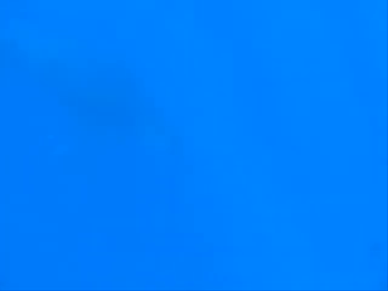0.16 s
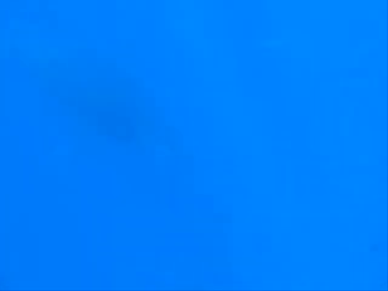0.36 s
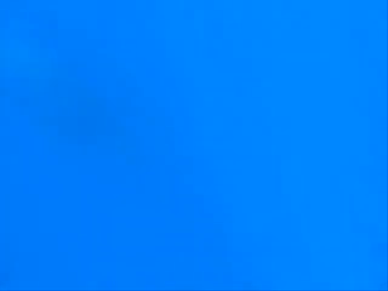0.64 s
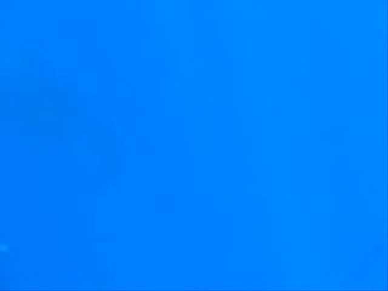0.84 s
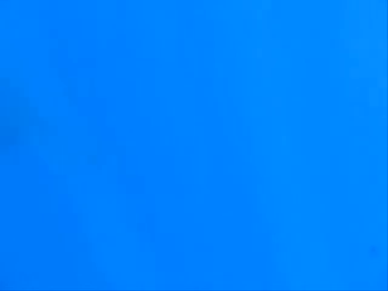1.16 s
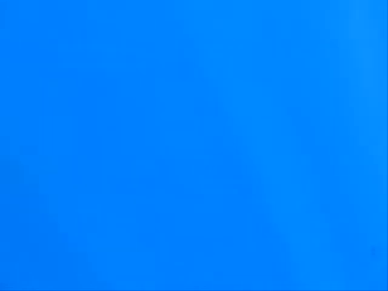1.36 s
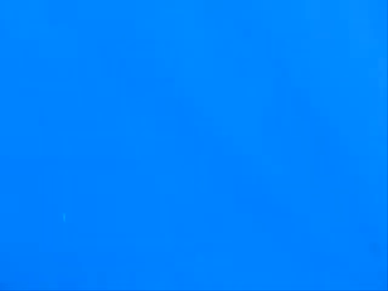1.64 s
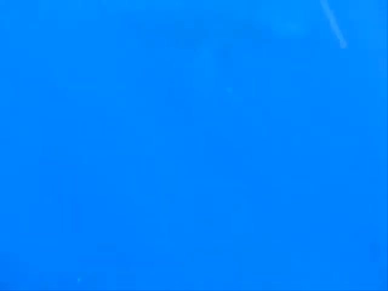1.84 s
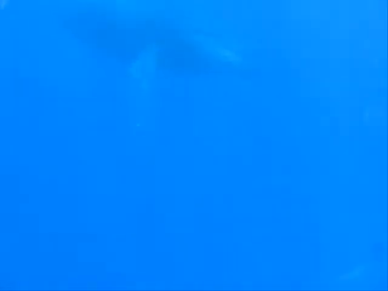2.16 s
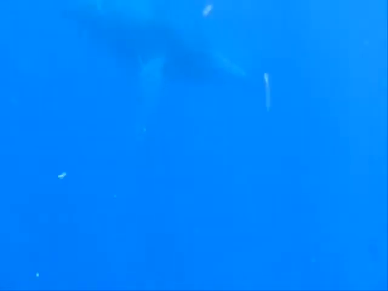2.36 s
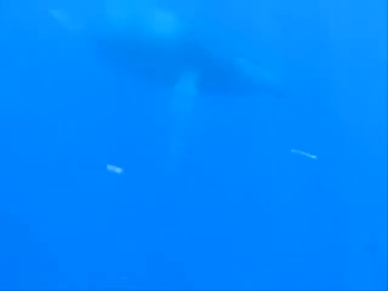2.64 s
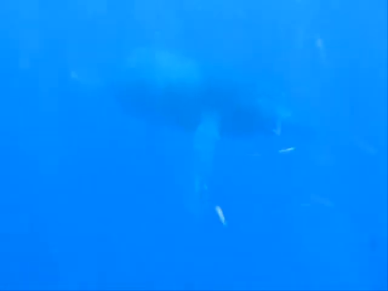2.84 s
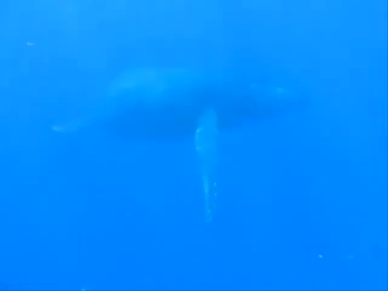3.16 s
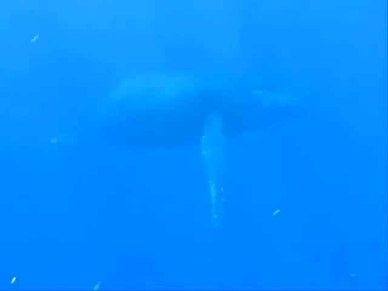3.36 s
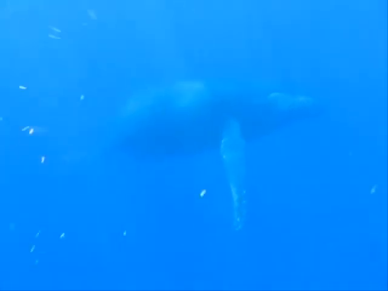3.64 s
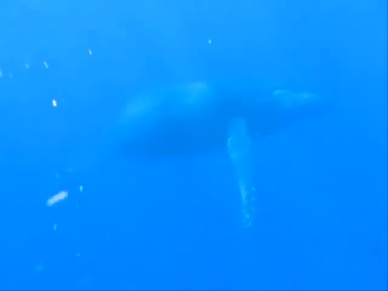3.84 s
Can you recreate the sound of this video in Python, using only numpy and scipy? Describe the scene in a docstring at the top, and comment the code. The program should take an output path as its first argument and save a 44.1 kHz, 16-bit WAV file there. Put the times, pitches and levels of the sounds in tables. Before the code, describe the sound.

Humpback whale song underwater: a high piercing cry, then a lower rough moan, with water glugs

```python
"""Humpback whale song at an underwater housing

A high cry, nearly sinusoidal with weak overtones, starts with a flutter made by modulation sidebands.
A moan, a pulse train through fixed resonances, climbs out of a creak, holds and sinks away.
Water glugs and small bubbles ring as damped tones; clicks are short noise bursts; slosh and hiss are
coloured noise. The song gains a reflection and a scattered tail. The right port hears far more than the left.
"""
import sys
import numpy as np
from scipy import signal
from scipy.fft import rfft, irfft
from scipy.io import wavfile
from scipy.ndimage import uniform_filter1d

SR = 44100
rng = np.random.default_rng(int(sys.argv[2]) if len(sys.argv) > 2 else 0)


def wav_out(sig):
    """Save sig, one row per channel (or a flat mono array), as 16-bit PCM at SR to the path in sys.argv[1]."""
    wavfile.write(sys.argv[1], SR, np.round(np.clip(np.atleast_2d(sig).T, -1, 1) * 32767).astype(np.int16))


N = 176400
T = np.arange(N) / SR  # time, s
EDGE_HZ = 12050  # upper band limit


def amp(db):
    """Level law: decibels to amplitude ratio."""
    return 10 ** (np.asarray(db) / 20)


def unit(x):
    """Normalization: scales a signal to an rms of 1."""
    return x / np.sqrt(np.mean(x ** 2) + 1e-20)


def steady(x):
    """Short-time normalization: holds the running rms near 1."""
    power = abs(uniform_filter1d(x ** 2, size=2048))
    return x / np.sqrt(power + 1e-9)


def curves(table):
    """Linear interpolation: joins each column of a table over time."""
    s, *columns = np.transpose(table)
    return [np.interp(T, s, column) for column in columns]


def during(table):
    """Gating: 1 between a table's first and last time, with 10 ms linear fades outside."""
    inside_s = np.minimum(T - table[0][0], table[-1][0] - T)
    return np.clip(inside_s * 100 + 1, 0, 1)


def add(mix, start_s, sound):
    """Superposition: adds a sound into the mix from its start time."""
    part = mix[max(round(start_s * SR), 0):][:len(sound)]
    part += sound[:len(part)]


def colour(x, points, size=4096):
    """Minimum-phase filtering: the log gain and its Hilbert transform give a causal response."""
    hz, db = np.transpose(points)
    bin_hz = abs(np.fft.fftfreq(size, 1 / SR))
    gain_db = np.interp(np.log(bin_hz + 1), np.log(hz), db)
    spectrum = np.exp(np.conj(signal.hilbert(np.log(amp(gain_db)))))
    taps = np.fft.ifft(spectrum).real
    return signal.oaconvolve(x, taps[:size // 2])[:N]


def noise(points):
    """Spectral shaping: white noise filtered to a curve, with an rms of 1."""
    return unit(colour(rng.standard_normal(N), points))


def wander(rate_hz):
    """Low-pass random fluctuation: noise confined mostly below a rate, with an rms of 1."""
    low_pass = 1 / (1 + (np.fft.rfftfreq(N, 1 / SR) / rate_hz) ** 4)
    return unit(irfft(rfft(rng.standard_normal(N)) * low_pass, N))


def angle(hz):
    """Phase is the time integral of angular frequency."""
    return 2 * np.pi * np.cumsum(hz) / SR


def random_phase():
    """Arbitrary starting phase of a partial, in radians."""
    return rng.uniform(0, 2 * np.pi)


def hiss():
    """Independent stationary noise at each port, left then right."""
    # Noise spectra of the ports: hz, relative_db
    left_spectrum = [(20, -6.5), (400, -1.5), (3500, -4), (6500, -9.5), (8000, -23.5), (12000, -23.5)]
    right_spectrum = [(400, 8.5), (1000, -1.5), (3700, -11.5), (4700, -10), (9000, -22.5)]
    left_db, right_db = -52, -53.5
    return amp(left_db) * noise(left_spectrum), amp(right_db) * noise(right_spectrum)


def slosh():
    """Random amplitude modulation of low coloured noise: water moving at the housing."""
    # Level of the slosh: time_s, level_db
    slosh_track = [(0, -52), (1.5, -58), (1.75, -36), (1.95, -41.5), (2.42, -49), (4, -57)]
    # Spectrum of the slosh: hz, relative_db
    slosh_spectrum = [(20, -15), (170, -8), (325, 1), (550, -27.5), (3500, -32), (8000, -60.5)]
    level_db, = curves(slosh_track)
    return noise(slosh_spectrum) * amp(level_db + 3.13 * wander(rate_hz=38))


def clicks():
    """Impulsive excitation: exponentially decaying noise bursts through a colouring filter."""
    # Dry clicks: start_s, level_db
    click_events = [(2.471, -30.5), (3.74, -30.5), (3.766, -28.5)]
    # Spectrum of the clicks: hz, gain_db
    click_spectrum = [(200, 4.5), (1400, 2), (4200, 8.5), (9000, -14)]
    decay_s = 0.0039  # time to fall to 1/e
    bursts, t = np.zeros(N), T[:SR // 4]
    for start_s, level_db in click_events:
        add(bursts, start_s, amp(level_db) * np.exp(-t / decay_s) * rng.standard_normal(len(t)))
    return colour(bursts, click_spectrum)


def ring(db, hz, t60_s, rise_s):
    """Damped resonance: a pocket of air swells into a decaying sinusoid."""
    t = T[:SR // 2]
    swell = 1 - np.exp(-(t / rise_s) ** 2)
    return amp(db - 60 * t / t60_s) * swell * np.sin(2 * np.pi * hz * t)


def bubbles():
    """Bubble resonance: small air volumes ring high and briefly."""
    # Small bubbles: start_s, level_db, pitch_hz
    bubble_events = [(1.561, -39, 1390), (1.843, -31, 1420), (1.889, -29, 1290), (1.937, -34.5, 1270)]
    out = np.zeros(N)
    for start_s, level_db, hz in bubble_events:
        add(out, start_s, ring(level_db, hz, t60_s=0.034, rise_s=0.00068))
    return out


def glugs():
    """Air-cavity resonance: each glug rings for a fixed number of cycles over a heavily damped thud."""
    # Water glugging on the housing: start_s, level_db, pitch_hz
    glug_events = [(0.604, -21.5, 304), (1.073, -32, 302), (1.325, -32.5, 282), (1.552, -20.5, 283),
                   (1.684, -20, 282), (1.721, -24, 285), (1.75, -14.5, 334), (1.833, -18, 310),
                   (1.852, -24, 308), (1.921, -22, 316), (2.091, -28.5, 328), (2.224, -28, 234),
                   (2.299, -32, 248), (2.449, -28.5, 322), (2.495, -19.5, 174), (2.598, -23.5, 243),
                   (3.133, -29.5, 240)]
    decay_cycles = 22.2  # cycles in a 60 dB decay
    thud_db, thud_s = -16.5, 0.0057  # relative to the glug; decay time and half period
    out, t = np.zeros(N), T[:SR // 4]
    thud = np.sin(np.pi * t / thud_s) * np.exp(-t / thud_s)
    for start_s, level_db, hz in glug_events:
        add(out, start_s, ring(level_db, hz, t60_s=decay_cycles / hz, rise_s=0.0033))
        add(out, start_s, amp(level_db + thud_db) * thud)
    return out


def sea(x):
    """Reflection and scattering: a delayed surface echo and a short, exponentially decaying random tail."""
    echo_s, echo_db = 0.041, -11.5
    tail_t60_s, tail_db = 0.36, -14  # level of the whole tail's energy
    t = T[:SR // 2]
    decay = amp(-60 * t / tail_t60_s)
    tail = amp(tail_db) * decay * rng.standard_normal(len(t)) / np.linalg.norm(decay)
    echo = amp(echo_db) * np.interp(T - echo_s, T, x, left=0)
    return x + echo + signal.oaconvolve(x, tail)[:N]


def moan():
    """Source-filter voice: pulses with subharmonic modulation pass through fixed resonances, with a rasp."""
    # Course of the moan: time_s, pitch_hz, level_db
    moan_track = [(2.52, 201.1, -46), (2.58, 238.9, -42), (2.635, 371.3, -33.5), (2.7, 489, -28),
                  (2.75, 536.6, -25.5), (2.815, 553, -20), (2.855, 529.7, -20.5), (2.95, 531.7, -21),
                  (3.02, 523.6, -19.5), (3.065, 529, -18), (3.16, 519.6, -18), (3.25, 525.5, -18),
                  (3.34, 562, -22.5), (3.46, 551.7, -25.5), (3.57, 490, -30.5), (3.62, 441, -33),
                  (3.67, 365, -31), (3.76, 246.3, -46), (3.81, 220, -54)]
    # Unevenness of the pulses: time_s, second_pulse_depth_db, third_pulse_depth_db, rasp_level_db
    rough_track = [(2.51, 8, -28, -56.5), (2.58, -3, 1, -35.5), (2.655, -18, -4, -28.5),
                   (2.7, 7, -5.5, -58), (2.85, -6, -21, -31.5), (2.97, -29, -42, -56),
                   (3.13, -38, -48, -41.5), (3.29, -42, -34, -22.5), (3.38, -42, -7, -41),
                   (3.55, -30, -30, -42), (3.8, -30, -27, -47)]
    # Resonances of the throat: hz, gain_db
    throat = [(100, -37), (200, -9.5), (290, 3), (350, 2), (450, -9.5), (680, -3.5), (1080, -0.5),
              (1500, -3), (1750, -12), (2130, 3.5), (2400, -12), (2700, -12), (3700, -20), (4500, -29.5),
              (6500, -21.5), (8200, -39.5), (9900, -27.5), (12000, -37)]
    # Spectrum of the rasp: hz, gain_db
    rasp_spectrum = [(200, -15.5), (900, -20.5), (1450, 8.5), (1800, -5.5), (2200, 9), (2900, 3.5),
                     (4600, -12), (6500, -17), (12000, -31)]
    jitter, rasp_air, rasp_steady = 0.00675, 2.3, 1  # relative pitch rms; relative amplitudes
    hz, level_db = curves(moan_track)
    second_db, third_db, rasp_db = curves(rough_track)
    phase = angle(hz * (1 + jitter * wander(rate_hz=228)))

    pulses = 0.5
    for k in range(1, 40):
        below_edge = np.clip((EDGE_HZ - k * hz) / hz, 0, 1)  # harmonics fade out near the band limit
        pulses = pulses + np.cos(k * phase) * below_edge
    pattern = 1 + amp(second_db) * np.cos(phase / 2) + amp(third_db) * np.cos(phase / 3)
    uneven_pulses = pulses * pattern
    voice = steady(colour(uneven_pulses, throat))

    rough_pulses = steady(uneven_pulses) * (rasp_steady + wander(rate_hz=210))
    puffs = rasp_air * (1 + np.cos(phase)) * rng.standard_normal(N)  # noise pulsing at the pitch
    rasp = steady(colour(rough_pulses + puffs, rasp_spectrum))
    return (amp(level_db) * voice + amp(rasp_db) * rasp) * during(moan_track)


def between_harmonics(phase, n):
    """Subharmonic series: fluctuating partials at multiples of 1/n of the pitch, harmonics left out."""
    total = np.zeros(N)
    for k in range(2 * n, 9 * n):
        if k % n:
            total += np.cos(k / n * phase + random_phase()) * (1 + 0.5 * wander(rate_hz=20))
    return total


def cry():
    """Modulation sidebands: a flutter splits a nearly pure tone at first and as it breaks off."""
    # Course of the cry, the last two relative to the level: time_s, pitch_hz, level_db, octave_db, upper_db
    cry_track = [(0, 1254, -35, -26, -11.5), (.19, 1247, -28, -30, -3.5), (.34, 1286, -19, -27.5, -10),
                 (.4, 1310, -16, -31.5, -17.5), (.47, 1302, -12.5, -33.5, -16),
                 (.535, 1322, -14.5, -20, -17.5), (.565, 1392, -18, -13.5, -30),
                 (.64, 1389, -18.5, -12, -29.5), (.84, 1401, -15.5, -10, -21.5),
                 (.92, 1375, -15.5, -12, -22.5), (1.08, 1373, -16.5, -16.5, -23.5),
                 (1.11, 1297, -20.5, -25, -6), (1.18, 1272, -32, -20, 3.5), (1.21, 1331, -28.5, -15, -17),
                 (1.3, 1277, -56, -5, -25)]
    # Roughness of the cry: time_s, flutter_depth_db, hiss_level_db
    rough_track = [(0, 9.5, -37.5), (.17, -6.5, -41), (.3, -40.5, -53.5), (1.1, -43.5, -61.5),
                   (1.24, -7, -37), (1.32, -2, -71)]
    # Side tones of the flutter: steps_from_pitch, relative_db
    side_tones = [(-2, -0.5), (-1, 3), (1, -5.5), (2, -11.5)]
    # Thin ringing above the register break: hz, relative_db
    ringing = [(5313, -27.5), (6401, -33), (9189, -33.5), (10901, -33)]
    # Spectra of the buzz, the upper overtones and the hiss: hz, relative_db
    buzz_spectrum = [(2000, -24), (4600, -1), (5400, 5), (8200, -7), (9300, 0.5)]
    overtone_spectrum = [(4200, 1.5), (5200, -11.5), (6500, -17.5), (7800, -22), (11000, -24.5)]
    hiss_spectrum = [(200, 0), (2200, 0.5), (4300, -3), (5200, 2), (8200, -15)]
    flutter_hz, flutter_wander, jitter = 89.8, 0.067, 0.0026  # the last two are relative rms
    overtone_flutter = 0.24  # share of the flutter that reaches the upper overtones
    break_hz, undertone_db, buzz_db = 1367.3, -18, -38.5  # pitch of the register break; relative levels
    hz, level_db, octave_db, upper_db = curves(cry_track)
    flutter_db, hiss_db = curves(rough_track)
    phase = angle(hz * (1 + jitter * wander(rate_hz=60)))
    beat = angle(flutter_hz * (1 + flutter_wander * wander(rate_hz=22)))

    flutter = np.zeros(N, complex)
    for step, side_db in side_tones:
        flutter += amp(side_db) * np.exp(1j * (step * beat + random_phase()))
    flutter *= amp(flutter_db)
    tone = (np.exp(1j * phase) * (1 + flutter)).real

    high = np.clip((hz - break_hz) / 20 + 0.5, 0, 1)  # 0 below the register break, 1 above
    undertone = high * amp(undertone_db) * np.exp(-1j * phase / 5)  # one fifth of the pitch below the octave
    octave = (np.exp(2j * phase) * (1 + undertone)).real
    overtones = sum(np.exp(1j * k * phase) for k in range(3, 10))
    upper = (overtones * (1 + overtone_flutter * flutter)).real

    # The buzz steps by half the pitch below the break and by one fifth of it above
    halves, fifths = between_harmonics(phase, 2), between_harmonics(phase, 5)
    buzz = amp(buzz_db) * colour((1 - high) * halves + 0.5 * high * fifths, buzz_spectrum)
    for line_hz, line_db in ringing:
        buzz += high * amp(line_db) * np.cos(angle(line_hz + 20 * wander(rate_hz=71)))

    voice = tone + amp(octave_db) * octave + amp(upper_db) * colour(upper, overtone_spectrum) + buzz
    breath = amp(hiss_db) * noise(hiss_spectrum) * during(rough_track)
    return np.sqrt(2) * amp(level_db) * voice * during(cry_track) + breath  # sqrt(2): sine peak from rms


def scene():
    """Two-port reception: song and water reach both ports, the left one slightly later, weaker and thinner."""
    # Response of the left port against the right: hz, gain_db
    left_port = [(100, -17.5), (450, -42), (1100, -14.5), (1500, -13.5), (2150, -24), (2900, -20.5),
                 (3800, -10), (5200, -13.5), (12000, -8.5)]
    left_lag_s = 0.00014
    song = cry() + moan()
    water = glugs() + bubbles() + clicks() + slosh()
    left_hiss, right_hiss = hiss()
    # Each port receives its own random scattered tail
    delayed = np.interp(T - left_lag_s, T, sea(song) + water)
    left = colour(delayed, left_port) + left_hiss
    right = sea(song) + water + right_hiss
    return np.array([left, right])


def record(dry):
    """Band limitation: a linear-phase low-pass filter."""
    taps = signal.firwin(511, EDGE_HZ, window=("kaiser", 9), fs=SR)
    return signal.oaconvolve(dry, taps[None], "same")


dry = scene()
out = record(dry)
wav_out(out)
```